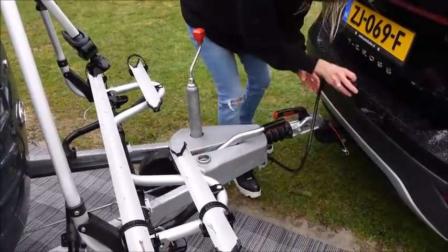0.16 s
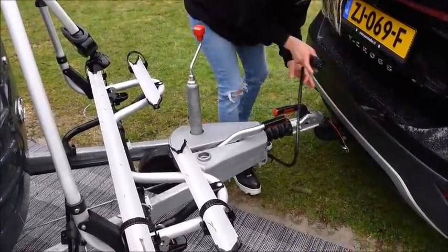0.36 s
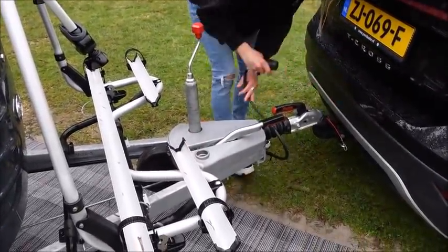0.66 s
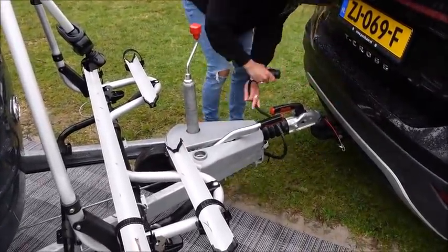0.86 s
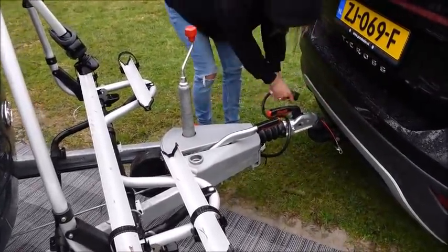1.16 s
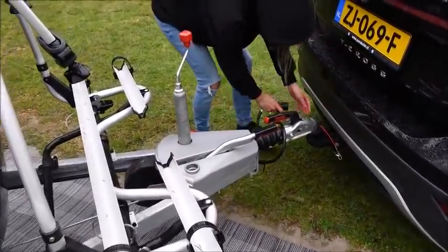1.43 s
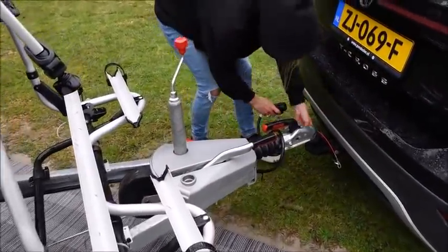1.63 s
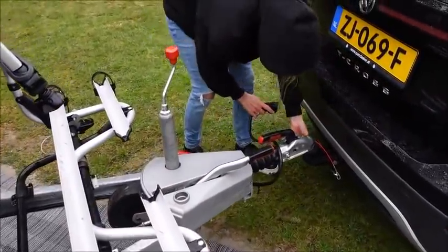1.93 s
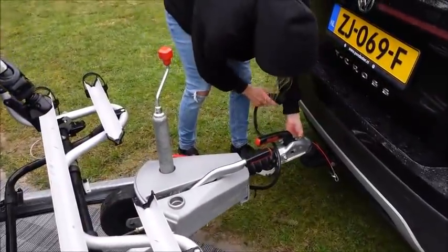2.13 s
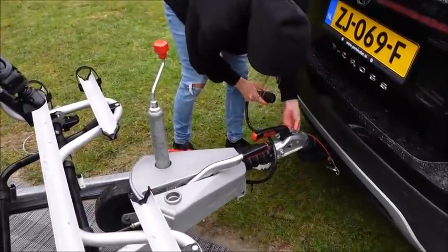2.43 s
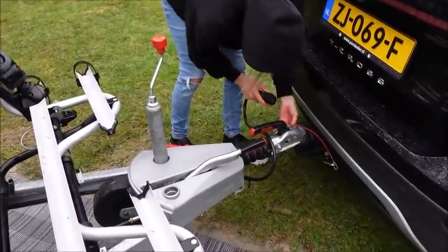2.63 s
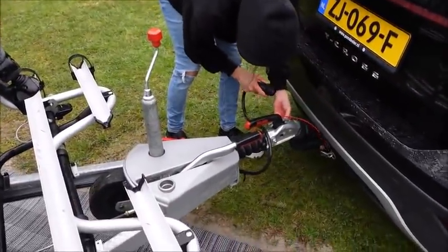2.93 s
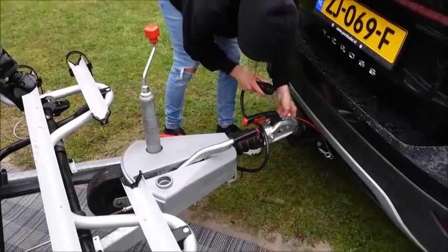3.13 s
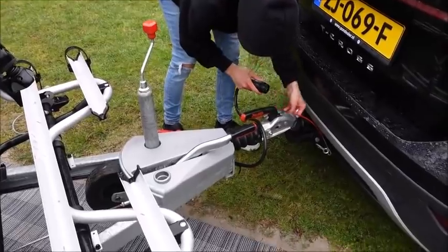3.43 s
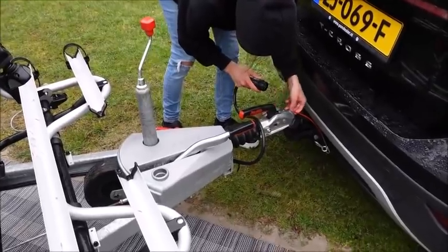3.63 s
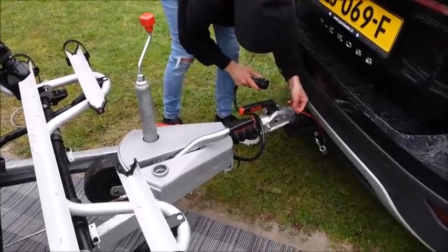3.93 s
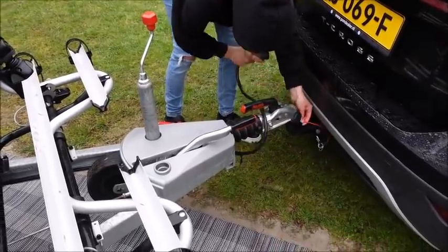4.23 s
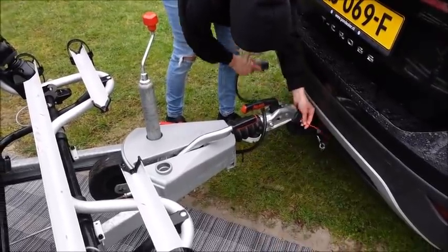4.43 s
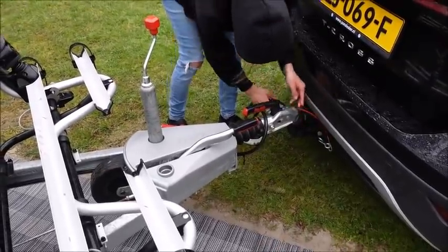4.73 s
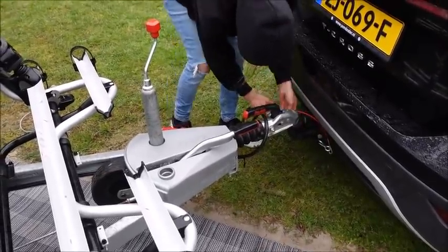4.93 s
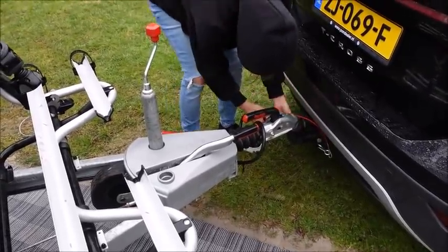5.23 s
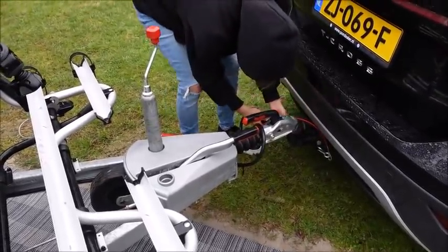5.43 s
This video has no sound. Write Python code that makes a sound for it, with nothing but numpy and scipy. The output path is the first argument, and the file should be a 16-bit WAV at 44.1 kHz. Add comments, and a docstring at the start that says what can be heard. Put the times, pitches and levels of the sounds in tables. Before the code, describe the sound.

A sharp plastic click, then a louder sprung lid snap with a brief rattle, amid small metal knocks, bird chirps and faint engine idle outdoors.

```python
"""Plug, lid and cable at a trailer hitch

A plug clicks, a sprung lid snaps shut and rattles, a bracket is scraped, the drawbar thuds: contacts drive modes.
A near bird chirps and others whistle, buzz and sing further off: gliding sines with echoes and scattered tails.
A car idles (engine orders and noise in resonant hollows) on a lawn under soft outdoor hiss (noise in bands)."""
import sys
import numpy as np
from scipy import signal
from scipy.fft import rfft, irfft
from scipy.io import wavfile

SR = 44100
rng = np.random.default_rng(int(sys.argv[2]) if len(sys.argv) > 2 else 0)


def wav_out(sig):
    """Save sig, one row per channel (or a flat mono array), as 16-bit PCM at SR to the path in sys.argv[1]."""
    wavfile.write(sys.argv[1], SR, np.round(np.clip(np.atleast_2d(sig).T, -1, 1) * 32767).astype(np.int16))


def volts(x):
    """Linear amplitude factor 10**(x/20) for a level x in dB, scalar or array-like."""
    e = np.asarray(x, float) / 20
    return 10 ** e


N = 245637  # length of the scene [samples]

# All blows: (time [s], peak level [dB], contact fall [ms], brightest pitch [Hz], spread to each side [octaves])
# All modes: (frequency [Hz], relative level [dB], decay by 60 dB [s])

# plug and cable ticking: blows
TICK_BLOWS = [(.2309, -9, 1.27, 6200, 1.73), (.2319, -11.5, 0.59, 4600, 1.23),
              (.2345, -14.5, 3.9, 4050, 0.98), (.359, -29.5, 2.2, 2980, 0.75),
              (.477, -40.5, 2.2, 6760, 0.19), (.972, -47, 2.9, 8500, 0.55), (.9985, -33.5, 1.1, 3600, 0.65),
              (2.956, -50, 1.8, 6000, 1.3), (3.207, -40, 4.3, 5000, 0.45), (3.237, -30.5, 2.5, 4830, 0.37),
              (4.1612, -34, 2.5, 5800, 0.59)]
# sleeve and cable brushing the plug: blows
BRUSH_BLOWS = [(.36, -43.5, 10, 9000, 0.9), (.596, -34.5, 9.2, 7500, 0.48), (1.255, -51, 9.5, 6300, 0.36),
               (2.107, -47.5, 33, 6500, 0.64), (2.15, -47, 8, 7000, .78), (4.668, -45.5, 15, 6100, 0.091),
               (4.686, -43, 14, 5500, 0.16)]
# the plug: modes
PLUG_MODES = [(1780, 4, 0.0094), (2500, -13, 0.13), (3120, -3, 0.016), (3940, -5, 0.011), (4130, 5, 0.017),
              (4400, 6.5, 0.013), (5460, -6, 0.01), (6500, -23, 0.017), (7300, -4, 0.032), (7700, -4, 0.04),
              (8350, 0, 0.0064), (10260, -7, 0.018), (12300, -11, 0.015), (13570, 1.5, 0.027)]
# the lid slides before it snaps: blows
SLIP_BLOWS = [(3.005, -23, 6.7, 1840, 0.32)]
# the sprung lid snaps shut and rebounds: blows
SNAP_BLOWS = [(3.0272, -5, 0.7, 1850, 1.22), (3.0274, -12.5, .8, 8200, 0.36),
              (3.0282, -8.5, 0.58, 2600, 0.97), (3.0291, -8, 0.73, 4020, 0.65),
              (3.0365, -23, 3.5, 3260, 0.67), (3.044, -23.5, 4.4, 1720, 1), (3.056, -27, 5.8, 1440, 0.44),
              (3.0765, -38, 2, 5000, 1), (3.083, -28.5, 4.4, 4400, 0.44), (3.0895, -26, 2.3, 2800, 1.3),
              (3.103, -32, 4.4, 4200, 0.42)]
# the lid: modes
LID_MODES = [(600, -4, 0.012), (800, -6, .012), (1160, -21, 0.029), (1412, -7.5, 0.075),
             (1610, -3.5, 0.024), (1780, 5.5, 0.012), (2260, -2.5, .015), (2940, 1, 0.011),
             (3630, -3, 0.021), (4400, -4, 0.019), (4870, -5.5, 0.02), (5580, -8, 0.02), (6640, -7, 0.014),
             (8180, -1.5, .012)]
# loose parts shaking after the snap: (time [s], level [dB])
RATTLE_LEVEL = [(3.029, -28.5), (3.04, -24.5), (3.055, -37.5), (3.072, -39), (3.088, -34.5), (3.1, -38),
                (3.14, -45), (3.19, -53.5), (3.267, -61)]
# colour of the rattle: (frequency [Hz], relative density [dB per Hz])
RATTLE_SPECTRUM = [(290, -39), (500, 1), (766, -2), (835, -4), (1170, -2), (2600, -2.5), (4100, 3),
                   (8730, -17), (15000, -70)]
# a thin steel bracket, scraped: blows
SCRAPE_BLOWS = [(2.626, -41, 9, 1900, 0.093), (2.641, -31, 11, 1700, 1.46), (2.659, -29, 10, 2280, 0.9),
                (2.68, -38, 14, 2050, .2), (2.68, -50, 50, 3750, .1), (2.7, -45, 170, 2070, 0.08)]
# the bracket: modes
BRACKET_MODES = [(800, 0, 0.024), (1030, -2.5, 0.025), (2000, -3, 0.062), (2043, -1, 0.06),
                 (2108, -1.5, 0.081), (2470, -9, .04), (3710, -5.5, 0.04), (3800, -10, 0.066)]
# knocks on the steel of the hitch: blows
KNOCK_BLOWS = [(.534, -37.5, 2.4, 800, 0.13), (.9995, -32, 4.4, 1500, 0.96),
               (2.134, -35.5, 2.9, 1900, 0.14), (1.002, -30.5, 6.5, 800, 0.57),
               (1.014, -37, 14, 1200, 0.66), (4.04, -39, 9.9, 1780, 0.9), (4.301, -39, 5, 2200, 1.1),
               (4.7028, -26, 2.1, 2280, 0.48), (4.7072, -37, 2.4, 1800, 0.95),
               (4.712, -30.5, 4.9, 1400, 0.85), (4.718, -34, 4.2, 1200, 1.1)]
# the hitch: modes
HITCH_MODES = [(563, -45, 0.035), (800, 12, 0.0077), (1083, -20, 0.0057), (1480, -21, 0.039),
               (1470, 4, 0.081), (1853, 4, 0.019), (2360, 4, 0.017), (2410, 6, 0.0037), (2950, 17, 0.003),
               (3720, 13, 0.022), (4200, 9, 0.017), (4600, -8, 0.014), (6900, 0, 0.012), (8100, 11, 0.012),
               (11300, -22, .006)]
# dull thuds in the hollow drawbar: blows
THUD_BLOWS = [(.531, -32, 22, 253, 0.55), (1.001, -36, 9.8, 255, 0.72), (1.445, -40.5, 6, 500, 0.2),
              (2.39, -41.5, 6.5, 200, 0.13), (3.04, -25.5, 36, 229, 0.88), (3.062, -44, 21, 105, 0.29),
              (4.291, -39.5, 51, 200, 0.34), (4.707, -40.5, 7.5, 430, 0.33), (5.421, -42, 14, 234, 0.61)]
# the drawbar: modes
DRAWBAR_MODES = [(105, 2, 0.61), (168, -29, 0.12), (229, -2.5, 0.12), (266, 3.5, 0.049), (334, 1, 0.17),
                 (447, 7, 0.063), (530, 6, 0.043)]

# near bird: (start [s], length [s], top of the swell before breaks [dB],
#             place of the top [share of length], place of the first break [share of length])
CHIRP_TIMES = [(0.094, 0.05, -36.5, 0.66, 0.37), (1.611, 0.055, -34.5, 0.63, 0.37),
               (2.096, 0.056, -33.5, 0.85, 0.41), (3.59, 0.061, -28, 0.81, 0.56),
               (4.143, 0.052, -32.5, 0.83, 0.57)]
# echoes of the chirps from car and trailer: (delay [ms], level [dB])
ECHOES = [(5.5, -12), (13, -16), (28, -21)]
# Far notes below: (start [s], length [s], glide from [Hz], glide to [Hz], reference level [dB])
# Their shapes: (time [share of length], pitch [share of the glide], level above the reference [dB])
# thin falling whistles: notes
WHISTLE_NOTES = [(.82, 0.37, 8640, 7900, -56), (2.585, .31, 8890, 7750, -51),
                 (4.74, 0.307, 8720, 7980, -52), (5.333, 0.26, 8790, 7700, -47)]
# a quick fall, a shelf and a last drop, swelling: shape
WHISTLE_CONTOUR = [(0, 0, -22), (.12, .2, -14), (.3, .43, -10), (.6, .6, -7), (.74, .56, -2.5),
                   (.93, .76, 0), (1, 1, -4)]
# buzzing song: notes
BUZZ_NOTES = [(1.025, 0.036, 3430, 3840, -55), (1.105, 0.028, 3440, 4200, -54.5),
              (1.17, 0.033, 3830, 4600, -51), (1.25, 0.027, 3930, 4620, -49.5),
              (1.335, 0.051, 4080, 4600, -48.5), (1.427, .15, 4030, 5300, -48),
              (1.41, 0.27, 7300, 6970, -64.5)]
# buzzing song: shape
BUZZ_CONTOUR = [(0, 0, -8), (.2, .12, -5), (.45, .66, 0), (.88, 1, -1.5), (1, .7, -6)]
# plain notes of birds in the trees: notes
TREE_NOTES = [(.715, 0.17, 8100, 7900, -69), (.76, 0.3, 3380, 3300, -58.5), (.98, .17, 8070, 7840, -68),
              (1.11, 0.21, 2930, 2880, -62), (1.17, 0.24, 5250, 5050, -66), (3.35, 0.2, 7640, 7300, -66.5),
              (3.59, 0.095, 5300, 5300, -71), (4.5, 0.14, 3600, 3410, -62), (4.72, 0.14, 7900, 7850, -76),
              (4.77, 0.18, 3500, 3350, -62), (5.07, 0.11, 5400, 5180, -62.5), (5.21, 0.18, 6500, 6500, -68),
              (5.31, 0.25, 4730, 4740, -59), (5.465, 0.016, 4700, 4130, -53)]
# plain notes: shape
TREE_CONTOUR = [(0, 0.175, 0.5), (1, 0.87, -1)]

# engine orders: (multiple of the firing rate [1], mean level [dB rms])
ENGINE_ORDERS = [(1, -63), (2, -67.5), (3, -67), (4, -58.5), (5, -70.5), (6, -70.5)]
# pipe and body hollows: (frequency [Hz], bandwidth [Hz], settled level [dB])
ENGINE_HOLLOWS = [(102.3, 11, -62.5), (200, 50, -65), (324.5, 36.5, -58), (548, 25, -65.5),
                  (1410, 91, -64.5), (1650, 76, -66), (1960, 52, -65.5), (2920, 110, -67)]
# colour of the outdoor hiss: (frequency [Hz], relative density [dB per Hz])
AIR_SPECTRUM = [(40, -20), (90, -11), (130, -5.5), (250, -11), (450, -11.5), (900, -15.5), (1300, -17.5),
                (2500, -15.5), (3600, -19.5), (4600, -24), (6300, -26.5), (8200, -38.5), (10000, -40),
                (15000, -44)]
# outdoor hiss: (time [s], level [dB])
AIR_CONTOUR = [(0.0, -50.5), (0.43, -48.5), (1.15, -49), (1.75, -50.5), (2.67, -50), (2.99, -48),
               (3.69, -51.5), (4.62, -49.5), (5.57, -49.5)]
# likeness of the two sides of banded noise: (frequency [Hz], left-right correlation [1])
STEREO_LIKENESS = [(60, 1), (180, 0.9), (550, 0.71), (1650, 0.85), (4970, 0.73), (15000, 1)]
# balance of the microphone: (frequency [Hz], left minus right [dB])
SIDE_BALANCE = [(60, -0.5), (180, -0.5), (550, -2.0), (1650, -4.5), (4970, -1), (15000, -0.5)]


def rms_one(x):
    """Normalizes a signal to unit root-mean-square."""
    return x / np.sqrt(np.mean(x ** 2) + 1e-20)


def at_hz(points, hz):
    """Interpolates a spectrum linearly in log frequency."""
    point_hz, value = np.transpose(points)
    return np.interp(np.log(hz), np.log(point_hz), value)


def drift(rate_hz, size=N):
    """Random fluctuation of unit spread: noise through two equal low-pass poles, on every 20th sample."""
    r = np.exp(-40 * np.pi * rate_hz / SR)
    noise = rng.standard_normal(size // 20 + 2002)
    slow = signal.lfilter([1], [1, -2 * r, r * r], noise)[2000:]  # leave out the filter's start
    return np.interp(np.arange(size) / 20, np.arange(len(slow)), rms_one(slow))


def add(out, x, s):
    """Superposes x on out from second s."""
    at = round(s * SR)
    out[..., at:at + x.shape[-1]] += x[..., :N - at]


def placed(x, pan_db):
    """Level-difference panning: left minus right is pan_db."""
    return x * volts([[pan_db / 2], [-pan_db / 2]])


def scatter(x, t60):
    """Diffuse reflection: trees and walls return exponentially decaying noise, independent at each ear."""
    t = np.arange(round(t60 * SR)) / SR
    decay = rng.standard_normal((2, len(t))) * volts(-60 * t / t60)
    tail = rms_one(decay) / np.sqrt(len(t))  # unit energy
    return signal.fftconvolve(x[None], tail, axes=1)[:, :N]


def banded_noise(spectrum, patchy_db, size=N):
    """Filtered noise: third-octave bands, each with its own level, flicker and correlation; rms 1."""
    out, edges = 0, 40 * 2 ** (np.arange(27) / 3)
    white = rng.standard_normal((2, 2, size))  # neighbouring bands use different noise
    for k, (low, high) in enumerate(zip(edges, edges[1:])):
        band = signal.butter(2, [low, high], "band", fs=SR, output="sos")
        mid, side = signal.sosfilt(band, white[k % 2])
        hz = np.sqrt(low * high)
        alike = np.clip(at_hz(STEREO_LIKENESS, hz), 0, 1)
        gain = volts(at_hz(spectrum, hz) + patchy_db * drift(10.3, size=size))
        out = out + gain * (np.sqrt(1 + alike) * mid + np.sqrt(1 - alike) * side * [[1], [-1]])
    return rms_one(out)


def strike(blows, modes, rise_ms, crack_db, click_db=-20.0):
    """Modal excitation: a noisy contact with a click drives damped modes and is heard as a crack."""
    contact_top_hz = 14500
    out, t = np.zeros(N), np.arange(SR // 3) / SR
    for s, peak_db, fall_ms, bright_hz, octaves in blows:
        rise = np.minimum(1000 * t / rise_ms, 1)
        fall = np.exp(-np.maximum(1000 * t - rise_ms, 0) / fall_ms)
        contact = rng.standard_normal(len(t)) * rise * fall + 1e-18
        contact[round(rise_ms * SR / 1000)] += volts(click_db)
        edges = [bright_hz / 2 ** octaves, min(bright_hz * 2 ** octaves, contact_top_hz)]
        crack = signal.sosfilt(signal.butter(2, edges, "band", fs=SR, output="sos"), contact)
        sound = volts(crack_db) * crack / np.abs(crack).max()
        for hz, level_db, t60 in modes:
            r, w = volts(-60 / (t60 * SR)), 2 * np.pi * hz / SR
            ring = signal.lfilter([0, 1], [1, -2 * r * np.cos(w), r * r], crack)
            # modes far from the contact's brightest pitch get less
            away_db = 4.8 * (np.log2(hz / bright_hz) / octaves) ** 2
            gain = volts(level_db - away_db + 1.5 * rng.standard_normal())
            sound += gain * ring / np.abs(ring).max()
        add(out, volts(peak_db) * sound / np.abs(sound).max(), s)
    return out


def plug():
    """Impact and friction on one body: sharp ticks and slower brushes excite the same plug modes."""
    ticks = strike(TICK_BLOWS, PLUG_MODES, rise_ms=0.4, crack_db=12.5, click_db=1.5)
    return ticks + strike(BRUSH_BLOWS, PLUG_MODES, rise_ms=6.5, crack_db=8.5)


def lid():
    """Friction, then impact: the lid slides with a slow rise, snaps with a fast one and rebounds."""
    slip = strike(SLIP_BLOWS, LID_MODES, rise_ms=8.4, crack_db=18.0)
    return slip + strike(SNAP_BLOWS, LID_MODES, rise_ms=0.29, crack_db=6.0, click_db=7.0)


def rattle():
    """Granular noise: dense, rapidly flickering grains whose loudness follows the shaking."""
    s, level_db = np.transpose(RATTLE_LEVEL)
    t = s[0] + np.arange(round((s[-1] - s[0]) * SR)) / SR
    noise = banded_noise(RATTLE_SPECTRUM, patchy_db=1.0, size=len(t))
    grains = noise * volts(2.2 * drift(290, size=len(t)))
    out = np.zeros((2, N))
    add(out, rms_one(grains) * volts(np.interp(t, s, level_db)), s[0])
    return out


def bracket():
    """Sustained friction: short and long scrapes keep driving the quickly damped modes of thin steel."""
    return strike(SCRAPE_BLOWS, BRACKET_MODES, rise_ms=4.3, crack_db=-4.0)


def hitch():
    """Impact on solid steel: a strong crack above short-lived modes."""
    return strike(KNOCK_BLOWS, HITCH_MODES, rise_ms=0.4, crack_db=21, click_db=2.0)


def drawbar():
    """Soft impact on a hollow beam: slower contacts excite only low modes."""
    return strike(THUD_BLOWS, DRAWBAR_MODES, rise_ms=2.3, crack_db=-0.5)


def handling():
    """Superposition of the struck and scraped parts near the centre, with a faint diffuse tail."""
    small, scrape = plug(), bracket()
    steel = hitch() + lid() + drawbar()
    direct = placed(small, 0.64) + placed(scrape, -.3) + placed(steel, 1.7)
    tail = volts(-18) * scatter(small + scrape + steel, 0.1)
    return direct + tail + placed(rattle(), 2.2)


def sing(notes, waver_db, flutter_hz, wobble_hz=0, swing_hz=0):
    """Frequency modulation: soft-ended sines glide, wobble or trill; air and leaves make the level flutter."""
    trill_per_s = 186
    out = np.zeros(N)
    for note in notes:
        s, hz, level_db = np.transpose(note)
        t = s[0] + np.arange(max(round((s[-1] - s[0]) * SR), 2)) / SR
        wobble = wobble_hz * drift(40, size=len(t))
        trill = swing_hz * np.sin(2 * np.pi * trill_per_s * t)
        pitch = np.interp(t, s, hz) + wobble + trill
        level = volts(np.interp(t, s, level_db) + waver_db * drift(flutter_hz, size=len(t)))
        ends = signal.windows.tukey(len(t), .15)
        tone = np.sqrt(2) * np.sin(2 * np.pi * np.cumsum(pitch) / SR)
        add(out, ends * level * tone, s[0])
    return out


def near_chirps():
    """Swept tone: each chirp climbs one bent slope, opens fast, swells and closes, with two brief level breaks."""
    from_hz, rise_hz, bend = 3354, 910, 1.92  # the rise starts slowly and speeds up
    start_db, open_share, open_db, end_db = -67, 0.22, -43.5, -41.5
    break_db, half_width = -16, 0.067  # half-width of both breaks is a share of the length
    top_break_s, top_break_db = 0.0029, -14  # second break, just after the top
    u, notes = np.linspace(0, 1, 60), []
    for s, length, peak_db, peak_share, break_share in CHIRP_TIMES:
        swell_db = np.interp(u, [0, open_share, peak_share, 1], [start_db, open_db, peak_db, end_db])
        swell_db += break_db * np.exp(-((u - break_share) / half_width) ** 2)
        top_break_share = peak_share + top_break_s / length
        swell_db += top_break_db * np.exp(-((u - top_break_share) / half_width) ** 2)
        notes.append(np.transpose([s + u * length, from_hz + rise_hz * u ** bend, swell_db]))
    return sing(notes, waver_db=1.0, flutter_hz=60)


def shaped(rows, shape):
    """Similarity: one contour is stretched over each row's time, glide and level, as (s, Hz, dB) points."""
    return [[(s + u * length, first_hz + glide * (last_hz - first_hz), level_db + db)
             for u, glide, db in shape]
            for s, length, first_hz, last_hz, level_db in rows]


def high_whistles():
    """Gliding tone: thin falling whistles with a slightly wobbling pitch."""
    notes = shaped(WHISTLE_NOTES, WHISTLE_CONTOUR)
    return sing(notes, waver_db=2.0, flutter_hz=120, wobble_hz=39.0)


def tree_birds():
    """Gliding tone: plain notes with an unsteady level and pitch."""
    return sing(shaped(TREE_NOTES, TREE_CONTOUR), waver_db=3.5, flutter_hz=100, wobble_hz=45)


def buzzing_song():
    """Fast wide frequency modulation: the trill is heard as a buzz."""
    notes = shaped(BUZZ_NOTES, BUZZ_CONTOUR)
    return sing(notes, waver_db=3.0, flutter_hz=380, wobble_hz=90, swing_hz=220)


def chorus():
    """Random superposition: faint short notes of many far birds sink slightly, weaker towards 7 kHz."""
    notes_per_s, lowest_note_db = 8, -64
    notes = []
    for when, high, span, slide in rng.random((80, 4))[:int(notes_per_s * N / SR)]:
        s, hz = when * N / SR, 2500 * 2.8 ** high
        level_db = lowest_note_db - 10.5 * high
        end_s, end_hz = s + 0.048 + 0.28 * span, hz * (0.88 + 0.065 * slide)
        notes.append([(s, hz, level_db), (end_s, end_hz, level_db)])
    return sing(notes, waver_db=3.5, flutter_hz=27)


def birds():
    """Interference and diffusion: near chirps beat with echoes off car and trailer; all voices get diffuse tails."""
    chirps, high = near_chirps(), high_whistles()
    far = tree_birds() + chorus() + buzzing_song()
    near = chirps.copy()
    for delay_ms, echo_db in ECHOES:
        add(near, volts(echo_db) * chirps, delay_ms / 1000)
    wet = volts(-8) * scatter(chirps, 0.22) + volts(-7.5) * scatter(high, 0.13) + volts(-8.0) * scatter(far, 0.2)
    return placed(near, 2.2) + placed(high, 1.4) + placed(far, .1) + wet


def idling():
    """Harmonics and resonance: engine orders on an unsteady firing rate, and noise that sings in hollows."""
    firings_per_s = 24.9
    bright_start_db, bright_fade_s = 6.5, 1.8  # hollows above 1 kHz start louder and settle
    t = np.arange(N) / SR
    turns = np.cumsum(firings_per_s * (1 + 0.02057 * drift(0.733))) / SR
    hum = np.zeros(N)
    for order, level_db in ENGINE_ORDERS:
        level = np.sqrt(2) * volts(level_db + 1.3 * drift(13.0))
        hum += level * np.sin(2 * np.pi * (order * turns + rng.random()))
    out = placed(hum, .1)
    for hz, width_hz, level_db in ENGINE_HOLLOWS:
        r, w = np.exp(-np.pi * width_hz / SR), 2 * np.pi * hz / SR
        noise = rng.standard_normal((2, N))
        mid, side = signal.lfilter([1, 0, -1], [1, -2 * r * np.cos(w), r * r], noise)
        bright_db = (hz > 1000) * bright_start_db * np.exp(-t / bright_fade_s)
        gain = volts(level_db + bright_db + 3.0 * drift(6.6))
        out = out + gain * rms_one(mid + 0.16 * side * [[1], [-1]])
    return out


def outdoor_air():
    """Broadband noise: soft hiss with patchy bands and a slowly changing level."""
    s, level_db = np.transpose(AIR_CONTOUR)
    return volts(np.interp(np.arange(N) / SR, s, level_db)) * banded_noise(AIR_SPECTRUM, patchy_db=2.0)


def scene():
    """Superposition: handling near the centre, with birds, air and the idling car around it."""
    return handling() + birds() + outdoor_air() + idling()


def lean(x):
    """Diffraction: body and ports of the microphone favour the right side in the midrange."""
    hz = np.maximum(np.arange(N // 2 + 1) * SR / N, 1)
    half = volts(at_hz(SIDE_BALANCE, hz) / 2)
    return irfft(rfft(x) * [half, 1 / half], N)


def low_pass(x):
    """Removes everything above the highest recorded frequency."""
    return signal.sosfilt(signal.butter(12, 16390, fs=SR, output="sos"), x)


def record(dry):
    """Band limits and saturation: the microphone cuts deepest bass and very top, rounds peaks and leans right."""
    overload = volts(-4)  # peaks are rounded off towards this level
    cut = signal.sosfilt(signal.butter(4, 42, "high", fs=SR, output="sos"), dry)
    rounded = overload * np.tanh(cut / overload)
    mellow = signal.sosfilt(signal.cheby2(10, 50, 16600, fs=SR, output="sos"), rounded)
    return low_pass(lean(mellow))


dry = scene()
out = record(dry)
wav_out(out)
```